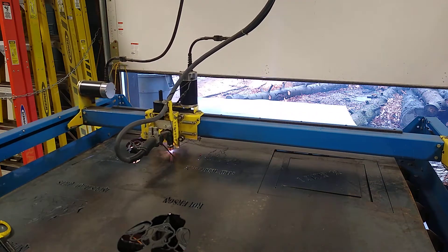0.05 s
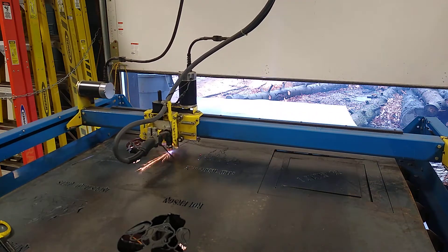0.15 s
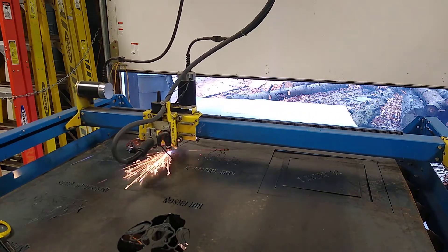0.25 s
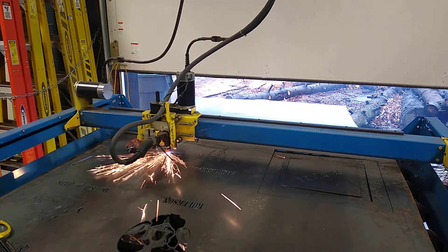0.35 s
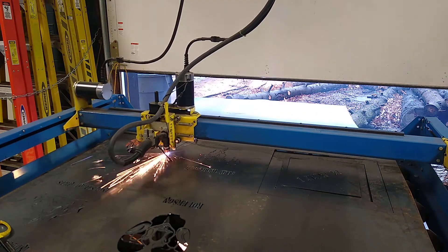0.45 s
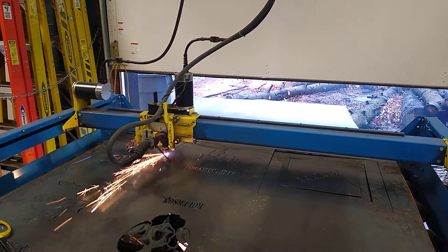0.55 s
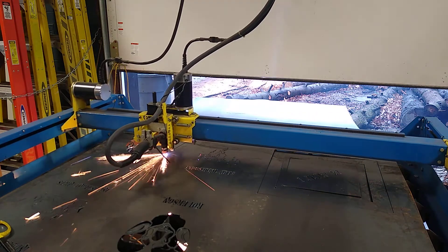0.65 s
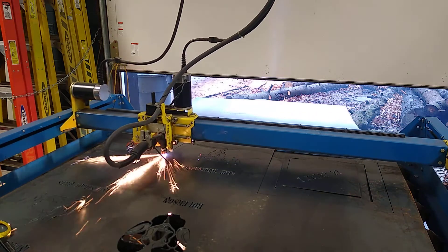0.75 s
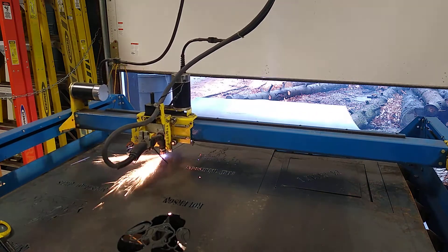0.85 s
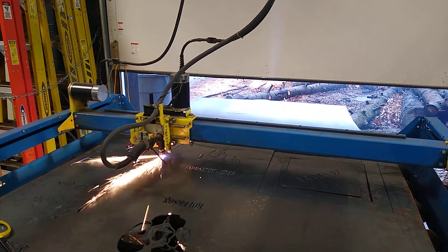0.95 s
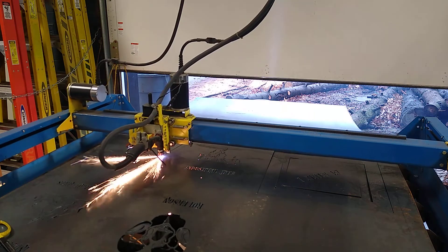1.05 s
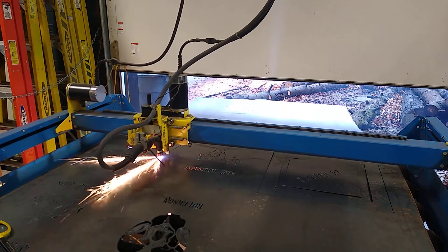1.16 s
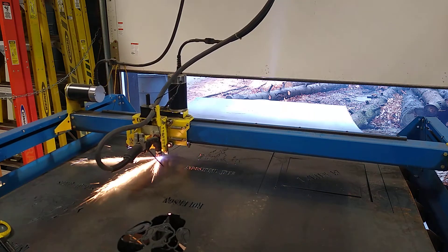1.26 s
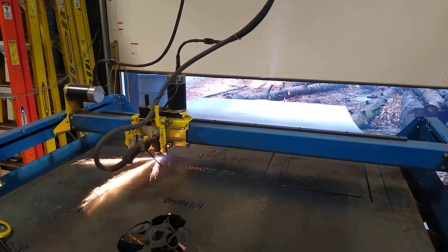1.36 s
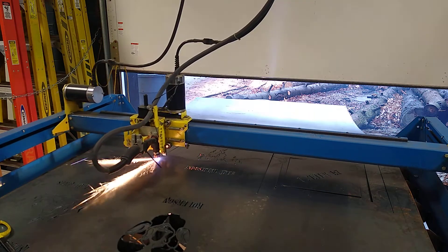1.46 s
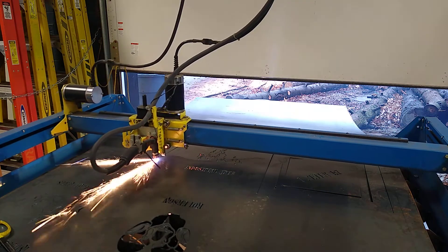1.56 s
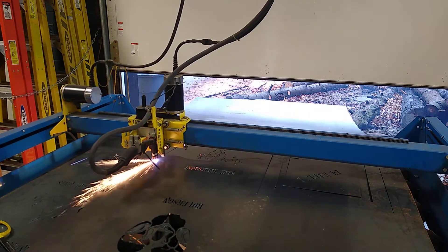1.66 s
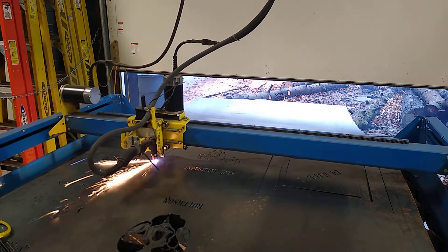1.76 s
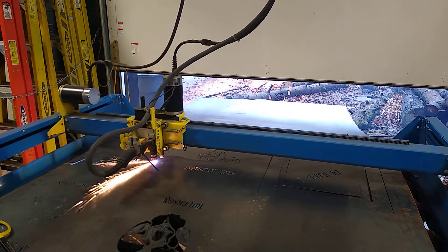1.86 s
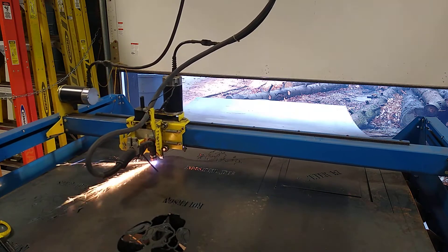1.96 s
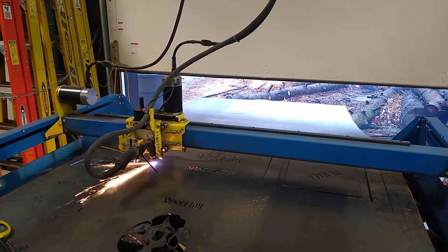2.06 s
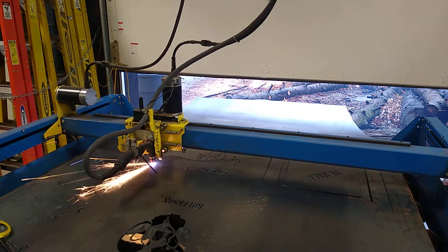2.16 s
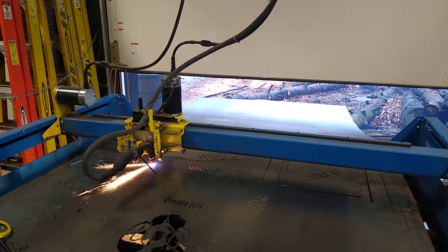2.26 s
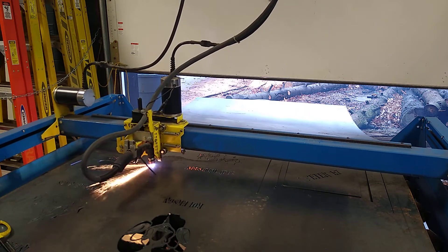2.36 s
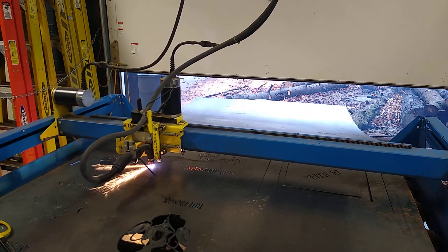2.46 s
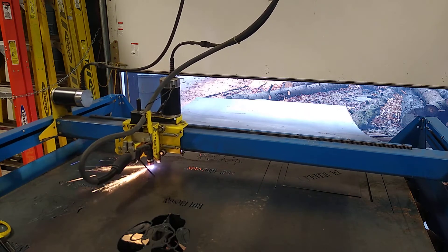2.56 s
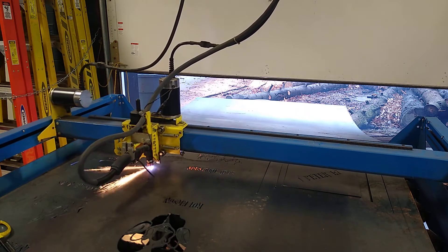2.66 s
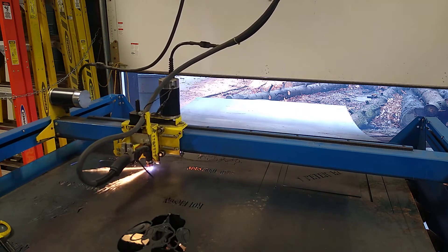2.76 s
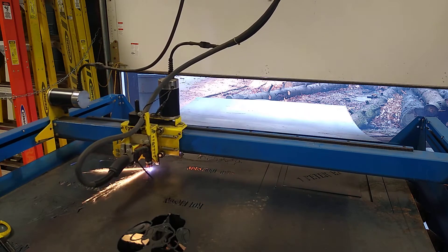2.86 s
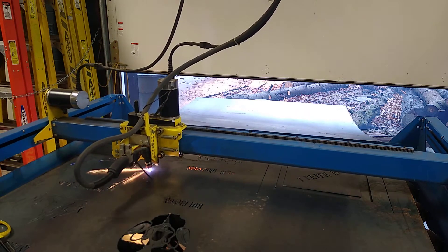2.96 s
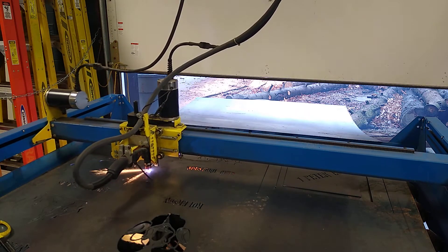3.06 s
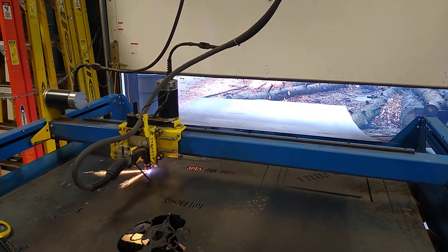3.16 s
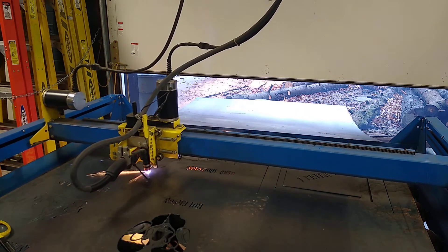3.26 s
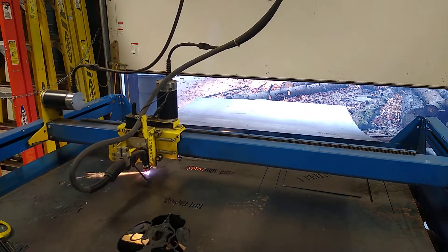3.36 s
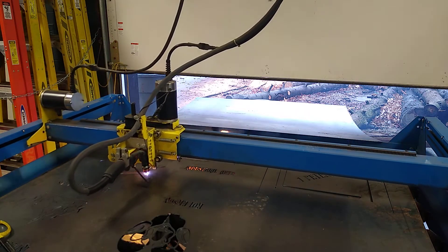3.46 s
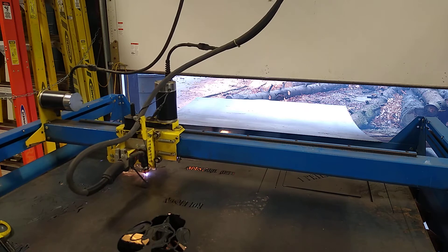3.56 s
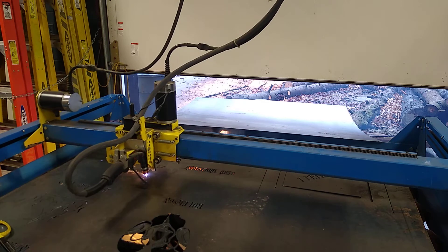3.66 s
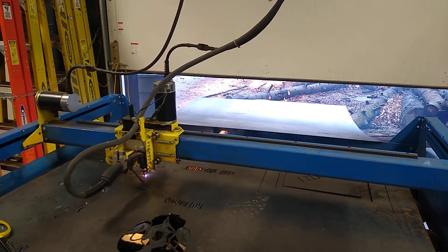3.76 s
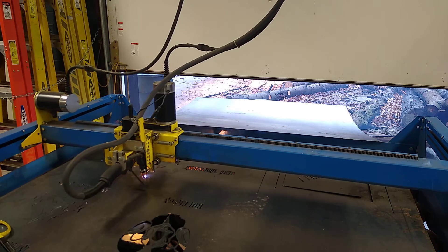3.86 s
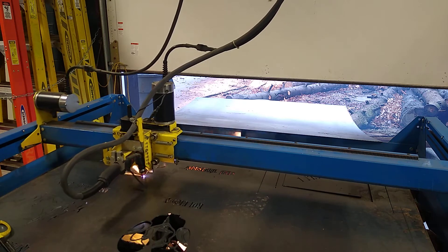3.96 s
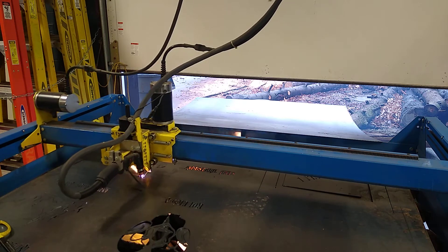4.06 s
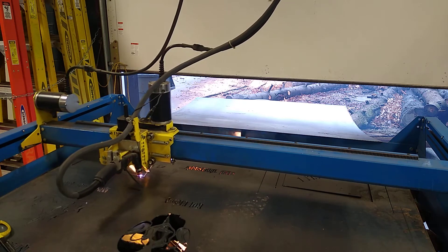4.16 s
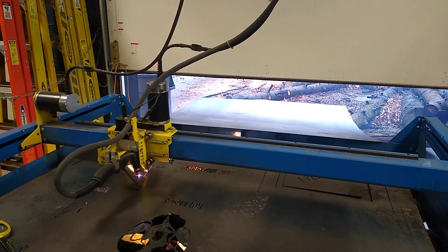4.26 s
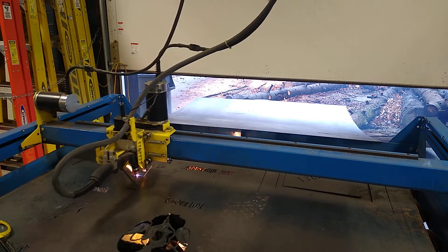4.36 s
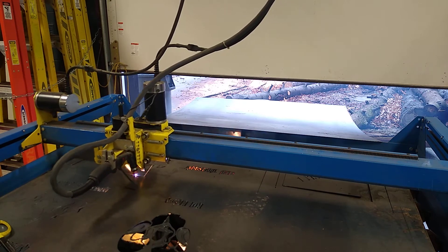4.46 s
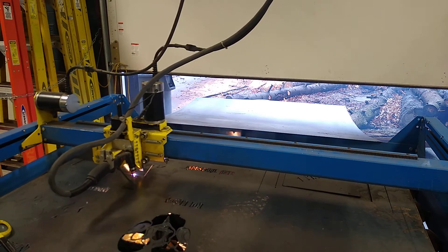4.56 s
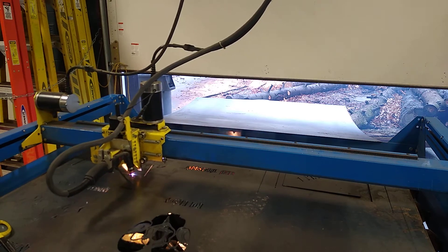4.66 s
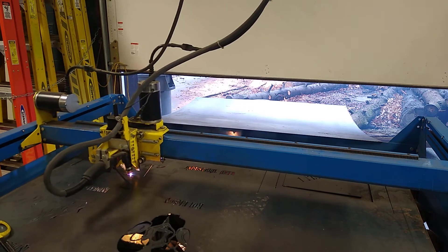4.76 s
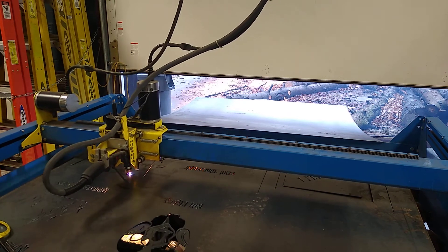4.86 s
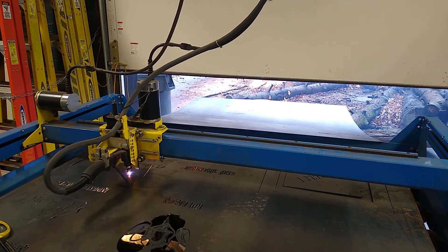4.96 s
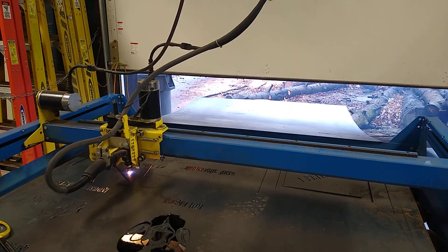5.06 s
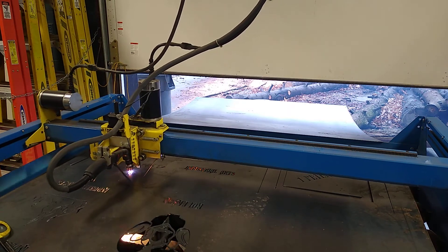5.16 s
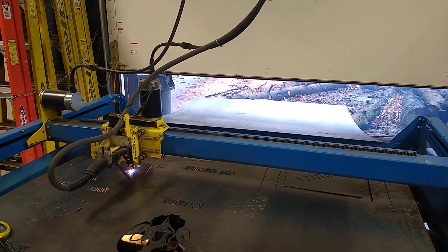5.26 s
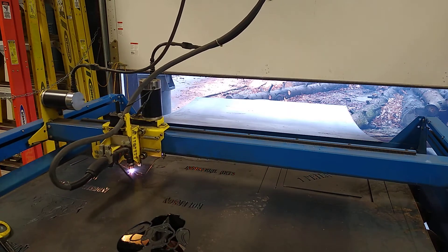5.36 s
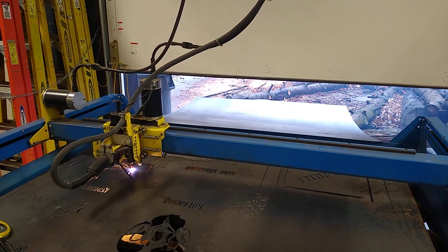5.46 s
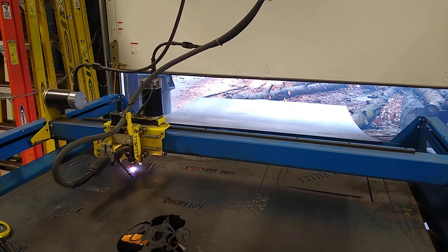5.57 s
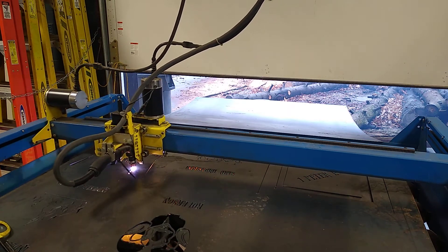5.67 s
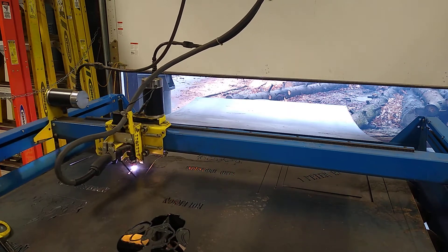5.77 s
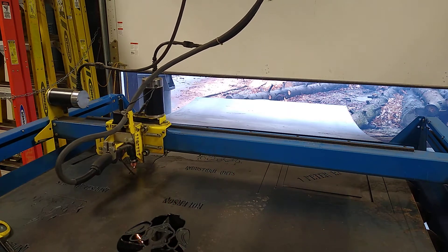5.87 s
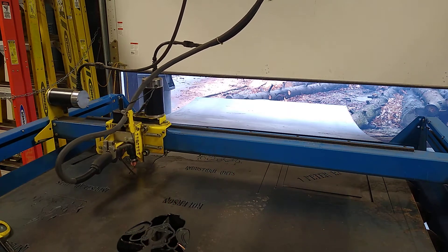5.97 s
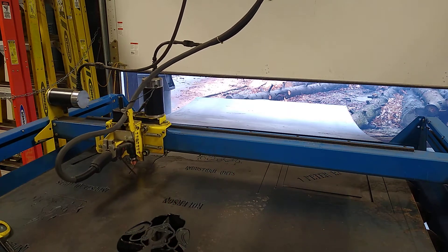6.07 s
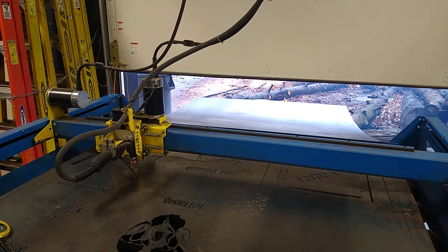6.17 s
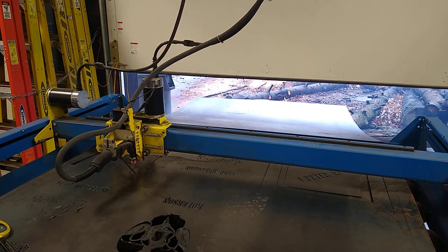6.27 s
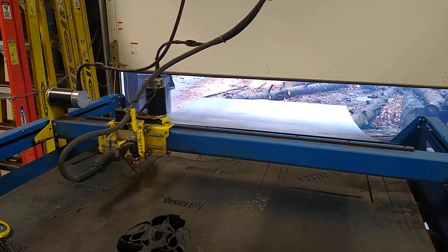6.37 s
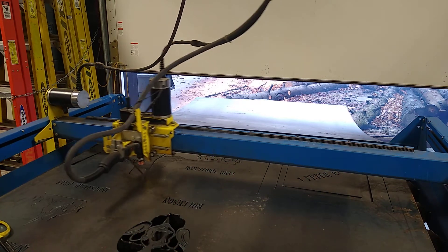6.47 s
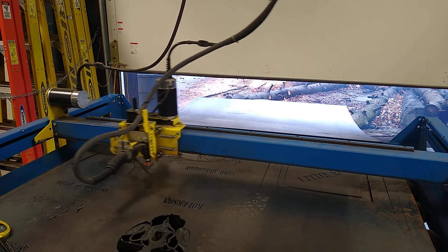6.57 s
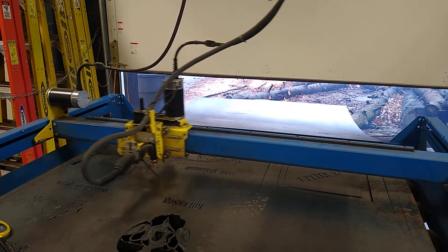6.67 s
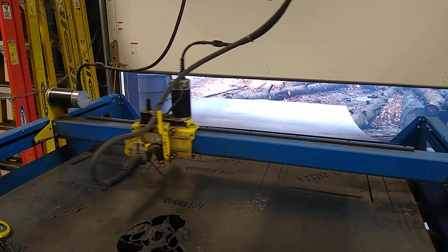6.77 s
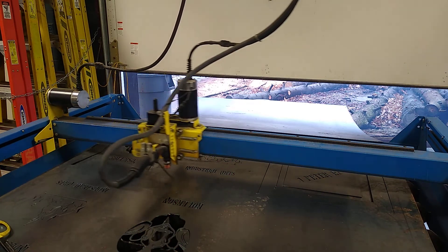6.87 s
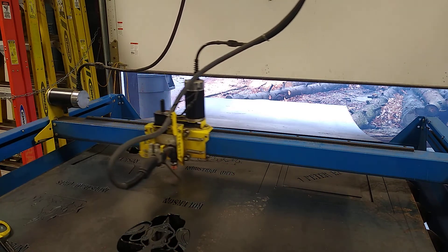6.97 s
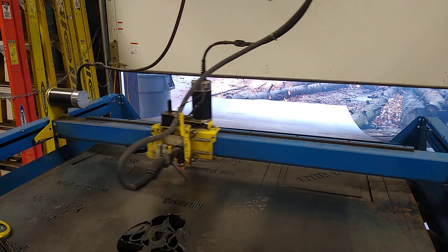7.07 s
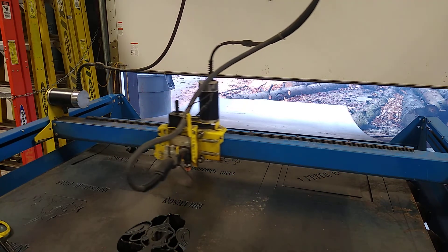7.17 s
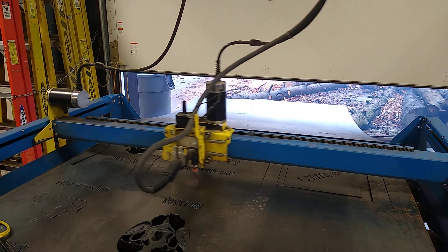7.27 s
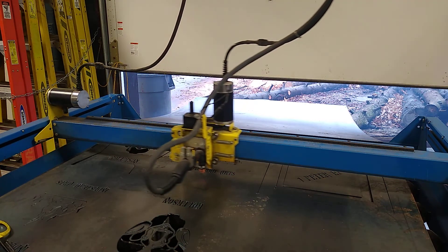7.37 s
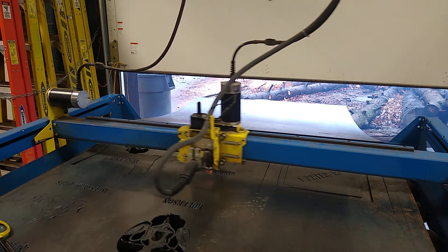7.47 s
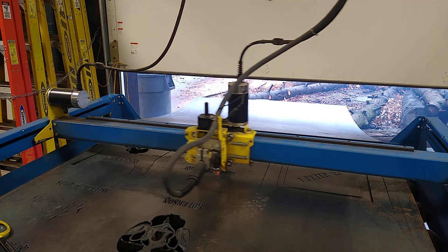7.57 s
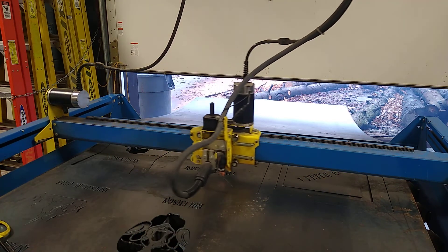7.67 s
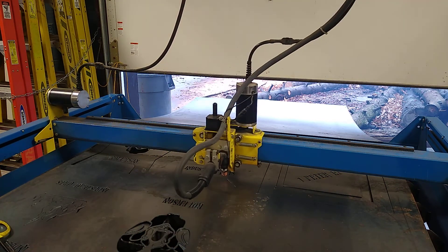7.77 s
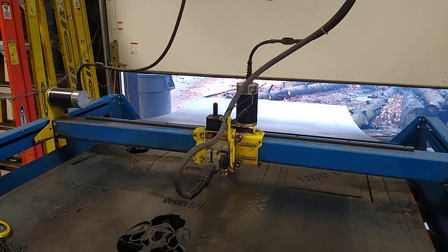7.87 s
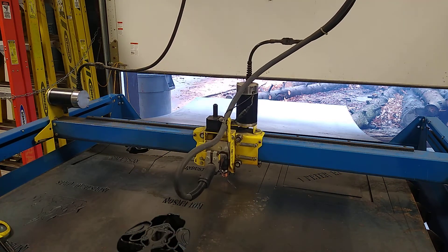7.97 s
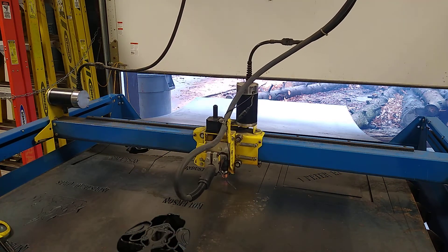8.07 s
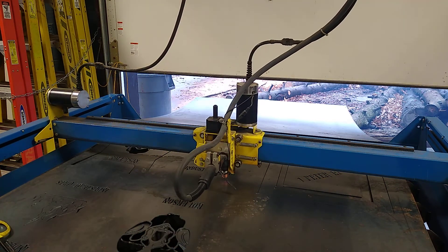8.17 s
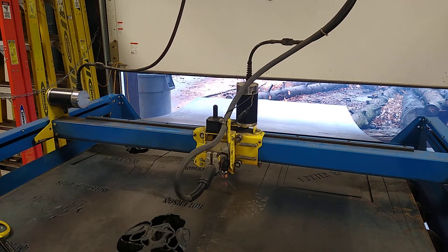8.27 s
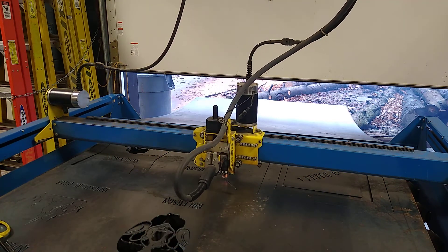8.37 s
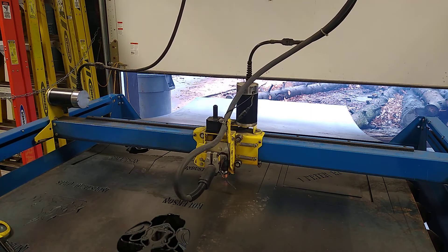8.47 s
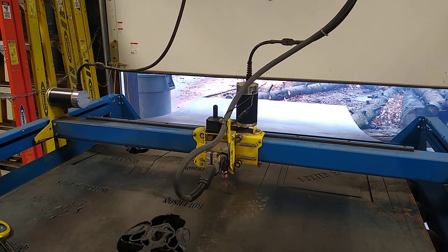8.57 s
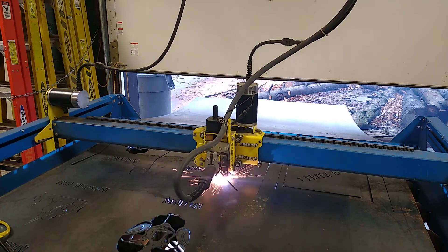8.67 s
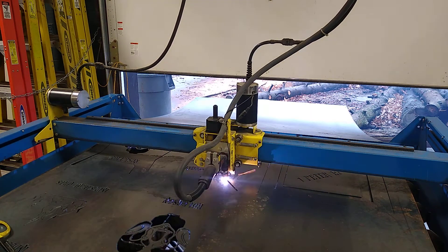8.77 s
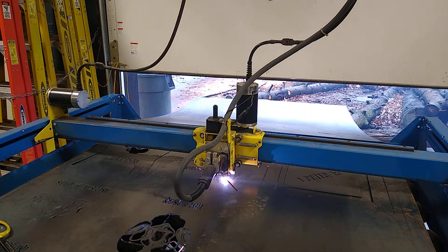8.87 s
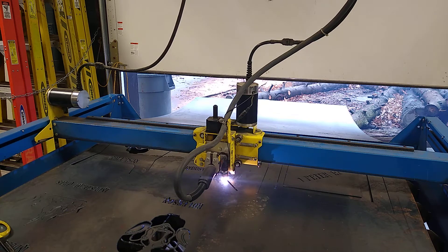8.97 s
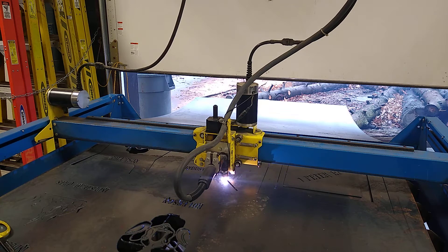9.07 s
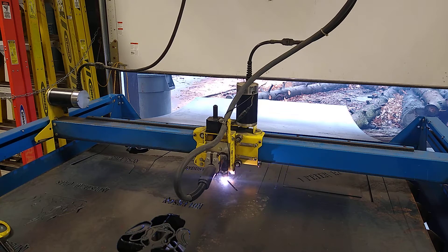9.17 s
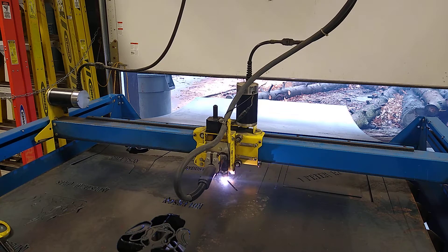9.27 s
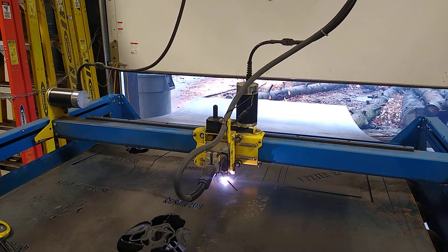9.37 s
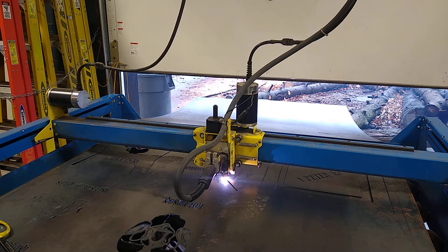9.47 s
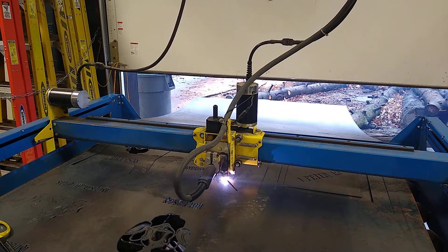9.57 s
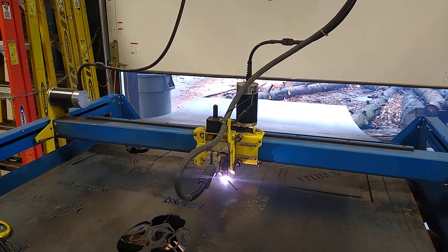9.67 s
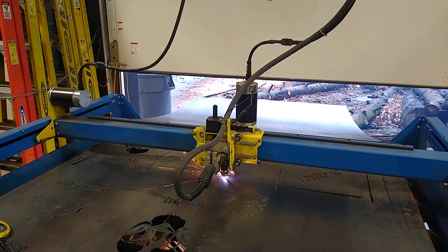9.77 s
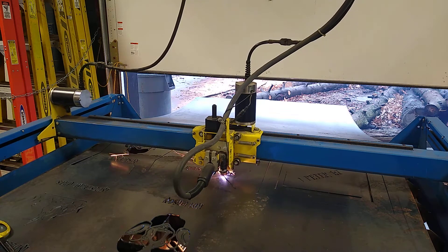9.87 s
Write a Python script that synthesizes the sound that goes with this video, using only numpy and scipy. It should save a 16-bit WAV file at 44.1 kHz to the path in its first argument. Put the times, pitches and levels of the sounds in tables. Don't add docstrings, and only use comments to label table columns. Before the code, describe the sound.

A cutting torch blows bright, fluttering gas noise around a narrow whistle, with several quick surges early and a cluster near six seconds. Gas alone rushes on, shuts off near eight, leaving throbbing compressor, hum and fan. Hard electrical snaps bring back a stronger, shriller jet on solid steel. Mono sound, rolled off at the lowest and highest frequencies, with short metallic echoes and light workshop reverb.

```python
import sys
import numpy as np
from scipy import signal
from scipy.fft import rfft, irfft, next_fast_len
from scipy.io import wavfile
from scipy.ndimage import uniform_filter1d, map_coordinates

SR = 44100
rng = np.random.default_rng(int(sys.argv[2]) if len(sys.argv) > 2 else 0)


def voltage_ratio(level):
    return 10 ** (np.asarray(level, float) / 20)


def unload_audio(sound):
    columns = np.transpose(np.atleast_2d(sound))
    steps = np.round(np.clip(columns, -1, 1) * 32767)
    wavfile.write(sys.argv[1], SR, steps.astype(np.int16))


N = 437472

# frequency [Hz], density [dB per Hz].
CUT_ROAR = [(300, -35.5), (700, -12), (1100, -6.5), (1700, -1), (2000, -2), (3000, -2), (3500, -19.5),
            (4500, -8)]
CUT_BODY = [(2500, -23.5), (3250, -3.5), (3400, -4), (3900, -3), (4500, -4.5), (5000, -5.5), (5800, -7),
            (6300, -21)]
FIZZ_COLOUR = [(4800, -34), (5700, -8.5), (6200, -5.5), (6900, -4), (7600, -3.5)]
# offset from its centre [Hz], density [dB per Hz].
KERF_WHISTLE = [(20, 0), (190, -1.5), (370, -5), (620, -11), (1000, -24), (2000, -70)]
# frequency [Hz], density [dB per Hz].
PIERCE_WHISTLE = [(3500, -30), (4400, -5), (4720, 0), (4900, -2.5), (5100, -1), (5500, -3.5), (6500, -9),
                  (7500, -25)]
PIERCE_ROAR_COLOUR = [(250, -30), (550, -3.5), (1000, -7), (1550, 0), (2000, -3), (2800, 0.5), (3100, -2),
                      (4200, -14.5)]
PIERCE_BODY_COLOUR = [(2900, -27.5), (3500, -2), (3850, 2.5), (4400, -3), (5000, -4.5), (5600, -31)]
# delay [s], level [dB].
STEEL_ECHOES = [(.0012, -20), (.0027, -18), (.0046, -17), (.0081, -17), (.013, -16)]
# delay [s], level [dB].
PLATE_MIRROR = (.001855, -11)
# time [s], whistle level [dB], whistle centre [Hz].
JET_FLOW = [(0, -34.5, 4985), (.7, -35.5, 5015), (1.7, -34, 4980), (2.1, -29.5, 4980), (2.5, -32, 5090),
            (2.8, -35, 5030), (3.9, -34, 4884), (5.0, -35.5, 4890), (5.35, -33, 4780), (5.94, -30, 4800),
            (6.0, -36, 4730), (7.0, -40, 4883), (8.3, -38.5, 4930), (8.82, -26, 4940), (9.1, -26, 4950),
            (9.55, -24.5, 4800), (9.92, -28.5, 4940)]
# start [s], peak [s], end [s], whistle level [dB], roar against it [dB].
EDGE_FLARES = [(0.169, .31, .44, -30, -0.5), (.455, .49, .755, -26, -3.5), (.56, 0.671, .755, -22, -7),
               (1.531, 1.65, 1.74, -30, 0), (3.449, 3.487, 3.68, -28.5, -4),
               (5.371, 5.413, 5.66, -31, -1.5), (5.556, 5.7, 5.93, -29, 3), (5.66, 5.73, 5.79, -23, -4),
               (5.8, 5.88, 5.925, -32, 1.5), (5.933, 5.948, 5.98, -31.5, 2), (6.08, 6.34, 6.41, -32, -3),
               (8.73, 8.754, 8.768, -27, -4)]
# start [s], then roar, body and fizz against the whistle [dB].
JET_STAGES = [
    (0, 2, -2, -4.5),
    (5.97, 1.5, -1.5, -3),
    (8.285, -7, -6, 2),
    (8.7, -5.5, -4.5, 0),
    (9.66, -2, -3.5, 0),
]
# start [s], peak level [dB], nozzle ring [Hz], decay t60 [s].
SNAPS = [
    (.472, -20, 5050, .02),
    (5.944, -19, 4760, .02),
    (8.684, -27, 4000, .012),
    (8.7247, -7.5, 3320, .014),
    (8.7525, -14, 4630, .014),
]
# multiple of shaft speed, level [dB rms].
LOUD_ORDERS = [(4, -51.3), (6, -55.4), (8, -54.4), (9, -57.4), (10, -52.1), (11, -57.1), (12, -52.6),
               (14, -51.4), (15, -53.7), (16, -54.2), (18, -44.9), (19, -53.2), (27, -50.2), (28, -55.1),
               (29, -47.1), (30, -52.6), (3, -66), (32, -52.2), (33, -45.6), (34, -52.8), (48, -52.9),
               (49, -52.4), (52, -47.6), (53, -52.6), (54, -46.3), (55, -49.2), (66, -53.7), (67, -53.2),
               (69, -53.6), (96, -52.9)]
# frequency [Hz], level [dB rms].
QUIET_ORDERS = [(40, -71.5), (70, -64), (450, -67), (900, -67), (1300, -61.5), (1700, -68), (2500, -66)]
# time [s], level [dB rms], path change [m].
TANK_SWELL = [(0, -48, -0.0073), (.9, -44.5, -0.016), (3.5, -42, 0), (6.4, -39.5, 0.003), (7.6, -40, -.1),
              (8.35, -42.5, -.1), (8.6, -47, -.1), (9.92, -47.5, -.1)]
# time [s], level change [dB], unsteadiness [dB].
PATH_SHADE = [(0, 0, 1), (8.9, 0, 1), (9.3, -6, 2.2), (9.92, -6, 2.2)]
# frequency [Hz], density [dB per Hz].
CASING_COLOUR = [(30, -45.5), (70, -18.5), (130, -4), (300, -11), (420, -3.5), (520, -4.5), (700, -5.5),
                 (1200, -1), (1380, -6), (1700, -1), (2500, -9), (3400, -4.5), (5000, -14.5), (6000, -23.5),
                 (7800, -28)]
# frequency [Hz], level [dB rms].
HUM = [(119.7, -43.5), (240, -59.5), (166.3, -55)]
# frequency [Hz], density [dB per Hz].
BLADE_TONE = [(900, -60), (937, -15.5), (946, 6.5), (953, -1.5), (990, -65.5)]
COWL_RING = [(3100, -50), (3320, -6), (3375, 0), (3440, -5.5), (3700, -44)]
# frequency [Hz], decay t60 [s].
ROOM_DECAY = [(300, 0.29), (3000, 0.3), (8000, 0.62)]
# frequency [Hz], gain [dB].
MIC_RESPONSE = [(20, -35.5), (42, -1), (7700, 2), (8000, -10), (8300, -17.5), (8500, -33.5), (8800, -72.5)]

SHAFT_HZ, TANK_ORDER = 22.603, 31
VALVE_SHUT_S, VALVE_OPEN_S, PIERCE_S, FULL_S = 8.285, 8.7, 8.78, 8.815
BLEED_DB_PER_S, BLEED_QUICKENS, FILL_DB_PER_S = 87, 2, 163
PUFF_DB, PUFF_RISE_S = 12, 0.017
FLARE_BODY_DB, FLARE_FIZZ_DB = -1.5, -2.5
FLARE_HOLD = 3
FIZZ_AT_DB, FIZZ_GROWS = -27.5, 0.73
FOCUS_DB = 5.5
SPLIT_HZ, SPLIT_WIDTH_HZ, SINGS_DB = 160, 60, 2.5


def unit(x):
    return x / np.sqrt(np.mean(x ** 2) + 1e-20)


def along(points, hz):
    f, v = np.transpose(points)
    return np.interp(np.log(hz + 1), np.log(f + 1), v)


def curves(rows, t):
    s, *cols = np.transpose(rows)
    return [np.interp(t, s, c) for c in cols]


def wobble(rate, t):
    return map_coordinates(rng.standard_normal(int(t[-1] * rate) + 4), [t * rate], order=2)


def filtered(x, gain):
    m = next_fast_len(N + 8192)
    return irfft(rfft(x, m) * gain(np.fft.rfftfreq(m, 1 / SR)), m)[:N]


def rush(spectrum, patchy_db):
    z = signal.stft(rng.standard_normal(N), nperseg=512)[2]
    field = uniform_filter1d(rng.standard_normal(z.shape), size=3, axis=0)
    field = uniform_filter1d(field, size=24, axis=1)
    x = signal.istft(z * voltage_ratio(patchy_db * unit(field)), nperseg=512)[1][:N]
    return unit(filtered(x, lambda hz: voltage_ratio(along(spectrum, hz))))


def whistle(level, centre_hz, focus):
    def mode_gain(hz):
        return 1 / (1 + ((hz - SPLIT_HZ) / SPLIT_WIDTH_HZ) ** 2)

    turn = 2 * np.pi * np.cumsum(centre_hz) / SR
    out = 0
    for carrier in (np.cos(turn), np.sin(turn)):
        noise = rush(KERF_WHISTLE, patchy_db=1)
        singing = unit(filtered(noise, mode_gain))
        out = out + (level * noise + voltage_ratio(SINGS_DB) * focus * singing) * carrier
    return out


def jet():
    t = np.arange(N) / SR
    level, roar, body, fizz, centre_hz, focus = controls()
    cut = voltage_ratio(-4.5) * whistle(level, centre_hz, focus)
    cut = cut + roar * rush(CUT_ROAR, patchy_db=1.5) + body * rush(CUT_BODY, patchy_db=1.0)
    pierce = level * rush(PIERCE_WHISTLE, patchy_db=1.2)
    pierce = pierce + roar * rush(PIERCE_ROAR_COLOUR, patchy_db=2.0)
    pierce = pierce + body * rush(PIERCE_BODY_COLOUR, patchy_db=2.0)
    gas = np.where(t < PIERCE_S, cut, pierce) + fizz * rush(FIZZ_COLOUR, patchy_db=-0.3)
    gas = gas * voltage_ratio(0.51 * wobble(60, t) + 0.31 * wobble(400, t))
    echoes = 0
    for delay_s, db in STEEL_ECHOES:
        drifting_s = delay_s * (1 + 0.0591 * wobble(.7, t))
        echoes = echoes + voltage_ratio(db) * np.interp(t - drifting_s, t, gas)
    mirror_s, mirror_db = PLATE_MIRROR
    mirror = filtered(np.roll(gas, round(mirror_s * SR)), lambda hz: np.clip(hz / 2500 - 1.2, 0, 1))
    return voltage_ratio(0.67) * (gas + echoes + (t > PIERCE_S) * voltage_ratio(mirror_db) * mirror)


def controls():
    t = np.arange(0, N, 32) / SR
    flow_db, centre_hz = np.where(t < VALVE_OPEN_S, curves(JET_FLOW[:-4], t), curves(JET_FLOW[-4:], t))
    shut_s = np.clip(t - VALVE_SHUT_S, 0, None)
    bleeding_db = BLEED_DB_PER_S * shut_s * (1 + BLEED_QUICKENS * shut_s)
    bleeding_db = bleeding_db - PUFF_DB * np.minimum(shut_s / PUFF_RISE_S, 1)
    filling_db = FILL_DB_PER_S * np.clip(FULL_S - t, 0, None)
    steady = voltage_ratio(flow_db - np.where(t < VALVE_OPEN_S, bleeding_db, filling_db)) ** 2
    sharp, broad = flares(t)
    fizz_power = (sharp / voltage_ratio(2 * FIZZ_AT_DB)) ** FIZZ_GROWS * voltage_ratio(2 * (FIZZ_AT_DB + FLARE_FIZZ_DB))
    flare_powers = [broad, broad * voltage_ratio(2 * FLARE_BODY_DB), fizz_power]
    begins, *colour_db = np.transpose(JET_STAGES)
    stage = np.searchsorted(begins, t, side="right") - 1
    colours = []
    for db, flare in zip(colour_db, flare_powers):
        gain = np.sqrt(steady * voltage_ratio(2 * db[stage]) + flare)
        colours.append(gain * voltage_ratio(1.08 * wobble(6, t)))
    centre_hz = centre_hz + 15 * np.minimum(10 * np.log10(1 + sharp / voltage_ratio(2 * flow_db)), 15)
    focus = np.sqrt(np.clip(sharp - voltage_ratio(2 * FOCUS_DB) * broad, 0, None))
    knobs = [np.sqrt(steady + sharp), *colours, centre_hz, focus]
    return [np.interp(np.arange(N) / SR, t, knob) for knob in knobs]


def flares(t):
    start, peak, end, db, broad_db = np.transpose(EDGE_FLARES)[:, :, None]
    rise = np.sin(np.pi / 2 * np.clip((t - start) / (peak - start), 0, 1)) ** 2
    fall = 1 - np.clip((t - peak) / (end - peak), 0, 1) ** FLARE_HOLD
    power = (voltage_ratio(db) * rise * fall) ** 2
    return power.sum(axis=0), (power * voltage_ratio(2 * broad_db)).sum(axis=0)


def strikes():
    out, t = np.zeros(N), np.arange(SR // 20) / SR
    for start_s, db, hz, t60 in SNAPS:
        burst = rng.standard_normal(len(t)) * .9 + .5 * np.sin(2 * np.pi * hz * t)
        envelope = voltage_ratio(db - 60 * t / t60) * (1 - np.exp(-t / 0.00076))
        out[round(start_s * SR):][:len(t)] += envelope * burst
    return filtered(out, lambda hz: np.clip(hz / 1500, 0, 1) * np.clip(4500 / (hz + 1), 0, 1))


def compressor():
    def full_rate(x):
        return signal.resample_poly(x, 7, 1)[:N]

    t = np.arange(N // 7 + 2) * 7 / SR
    turn = 2 * np.pi * np.cumsum(SHAFT_HZ + .006 * wobble(1.5, t)) * 7 / SR
    loud = {round(k): db for k, db in LOUD_ORDERS}
    tank_db, path_m = curves(TANK_SWELL, t)
    shade_db, unsteady = curves(PATH_SHADE, t)
    tank_slip = 2 * np.pi * TANK_ORDER * SHAFT_HZ * path_m / 343
    lines = 0
    for k in range(2, 110):
        phase = k * turn + np.pi * k * k / 8.7 + .7 * rng.standard_normal()
        scatter_db = 3 * rng.standard_normal()
        db = loud.get(k, along(QUIET_ORDERS, k * SHAFT_HZ) + scatter_db)
        if k == TANK_ORDER:
            db = tank_db
            phase = phase - tank_slip
        elif k > 16:
            db = db + shade_db
        drift_db = min(k / 12, 1.5) * unsteady * wobble(2.436, t)
        lines = lines + voltage_ratio(db + drift_db) * np.sin(phase)
    for hz, db in HUM:
        lines = lines + voltage_ratio(db) * np.sin(2 * np.pi * hz * t)
    valve_beat = voltage_ratio(0.74 * np.sin(turn) + 1.0 * np.sin(2 * turn + 1))
    casing = voltage_ratio(-35.5) * full_rate(valve_beat) * rush(CASING_COLOUR, patchy_db=1.0)
    return np.sqrt(2) * full_rate(lines) + casing


def fan():
    blade_db = -48 + curves(PATH_SHADE, np.arange(N) / SR)[0]
    return voltage_ratio(blade_db) * rush(BLADE_TONE, patchy_db=0.0) + voltage_ratio(-49.5) * rush(COWL_RING, patchy_db=2)


def shop(x):
    hz, t, z = signal.stft(rng.standard_normal(SR // 2), SR, nperseg=256)
    decay = voltage_ratio(-60 * t / along(ROOM_DECAY, hz)[:, None])
    tail = signal.istft(z * decay, SR, nperseg=256)[1]
    return signal.fftconvolve(np.pad(x, (700, 0)), tail / np.linalg.norm(tail))[:N]


def scene():
    torch = jet() + strikes()
    mono = torch + voltage_ratio(-13) * shop(torch) + compressor() + fan()
    return np.array([mono, mono])


def low_pass(x):
    return signal.sosfilt(signal.butter(12, 9000, fs=SR, output="sos"), x)


def record(dry):
    mono = filtered(dry[0], lambda hz: voltage_ratio(along(MIC_RESPONSE, hz)))
    memory = .6 * SR
    power = signal.lfilter([1 / memory], [1, 1 / memory - 1], mono ** 2)
    mono = mono * (1 + power / voltage_ratio(-23)) ** -.3
    return low_pass(np.array([mono, mono]))


dry = scene()
out = record(dry)
unload_audio(out)
```